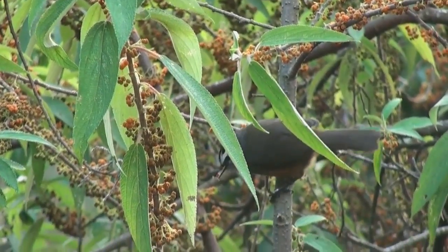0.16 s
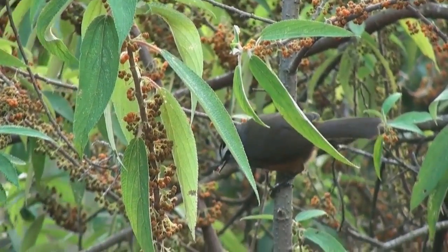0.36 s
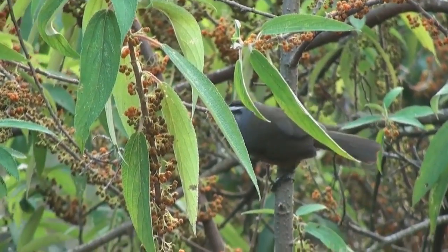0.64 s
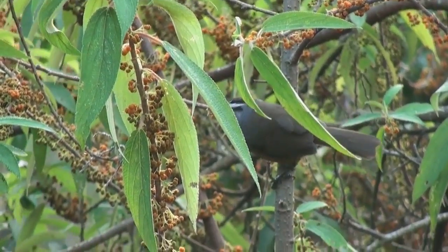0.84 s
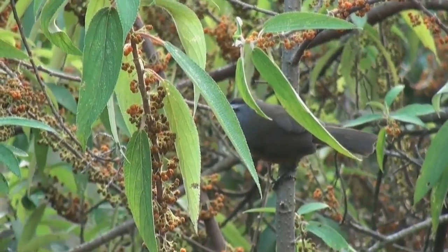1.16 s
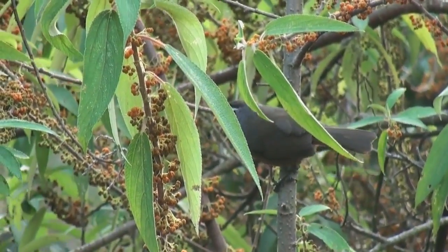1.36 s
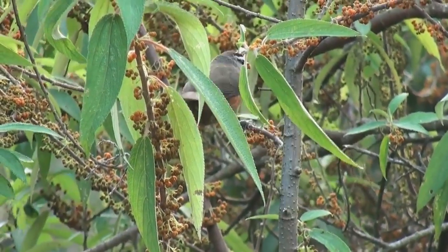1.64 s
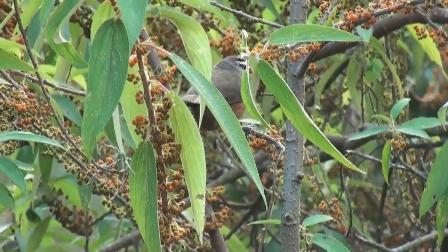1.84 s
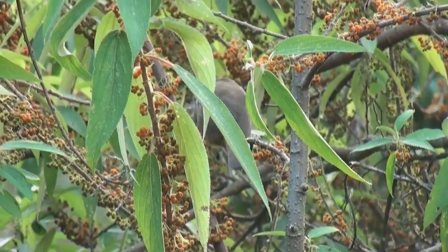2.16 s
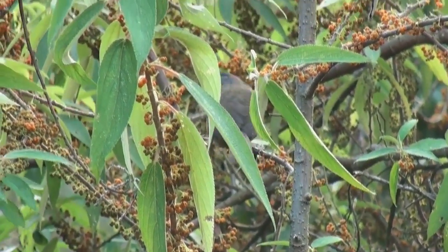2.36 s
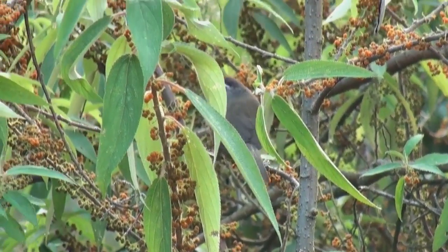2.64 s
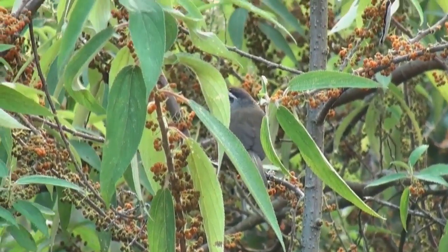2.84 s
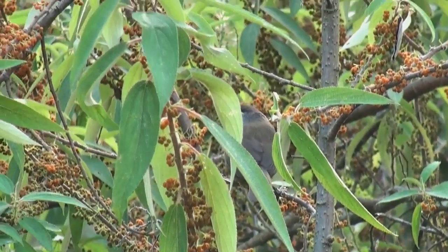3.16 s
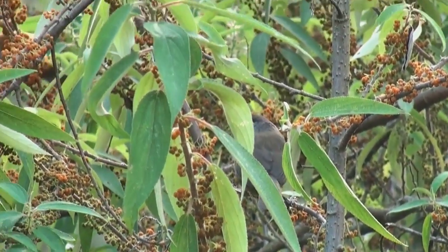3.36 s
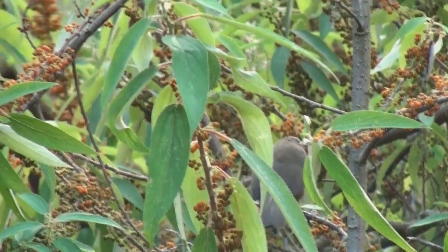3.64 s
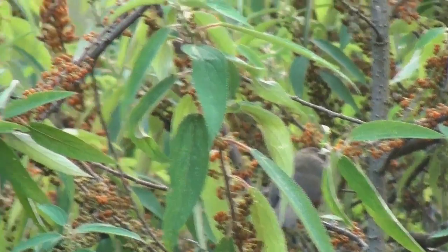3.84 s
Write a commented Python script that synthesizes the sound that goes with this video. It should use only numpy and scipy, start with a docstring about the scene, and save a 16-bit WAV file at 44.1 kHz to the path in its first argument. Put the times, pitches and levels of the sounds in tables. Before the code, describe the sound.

Thrush-like bird whistling brief gliding notes, echoing among leaves, over a steady airy background wash.

```python
"""Shrubs to the left and right of a camera, where thrushes whistle short, mostly falling notes; fainter birds
call from farther off. Each note is a near sine on a gliding pitch, and its echoes hang among leaves and trunks.
Short bursts of filtered noise make a soft low flutter as a bird hops and a brief rustle of leaves.
A broad outdoor wash of shaped noise and a thin high camera hiss lie under it all."""
import sys
import numpy as np
from scipy import signal
from scipy.fft import rfft, irfft
from scipy.io import wavfile
from scipy.ndimage import uniform_filter1d

SR = 44100
rng = np.random.default_rng(int(sys.argv[2]) if len(sys.argv) > 2 else 0)


def generate_wav(sig):
    """Save sig (samples, or channels by samples) to the path in sys.argv[1] as 16-bit PCM at SR."""
    pcm = np.round(np.clip(np.atleast_2d(sig).T, -1, 1) * 32767).astype(np.int16)
    wavfile.write(sys.argv[1], SR, pcm)


N = 176400  # 4 s

FLICKER_DB = 1.42  # slow level wander of the wash and of the hiss


def undb(db):
    """Decibels to an amplitude factor."""
    return 10 ** (np.asarray(db) / 20)


def unit(x):
    """Scale to an RMS of 1."""
    return x / np.sqrt(np.mean(x ** 2))


def walk(rate_hz, size):
    """Random levels held 1 / rate_hz seconds and slewed twice; spread near 1."""
    hold = int(SR / rate_hz)
    steps = np.repeat(rng.standard_normal(size // hold + 1), hold)
    slewed = uniform_filter1d(uniform_filter1d(steps, hold), hold)
    return 1.223 * slewed[:size]


def read(table, hz):
    """Read a (hz, db) curve along a logarithmic frequency axis."""
    table = np.array(table, float)
    return np.interp(np.log(hz + 1), np.log(table[:, 0]), table[:, 1])


def birds():
    """Every note stands at its own place between left and right; its echoes lean half as far to that side."""
    # Whistled notes, near and far: left_minus_right_db, echo_db (against the note), glide points
    # Each glide point: time_s, pitch_hz, level_db
    whistles = [ (-3, 4, [(-.09, 4450, -38), (-.05, 4190, -47), (-.01, 3644, -43.5), (0, 3420, -43.5)]),
                (5, -7.5, [(.025, 4670, -55), (.045, 4506, -38), (.07, 3780, -26.5), (.091, 3536, -28.5),
                (.098, 3030, -41)]), (3, -10, [(.135, 2476, -58), (.15, 2800, -43), (.181, 2815, -36.5),
                (.2, 2680, -35.5), (.225, 1860, -51)]), (2.5, -5, [(.195, 2750, -46), (.212, 2950, -36),
                (.235, 3000, -32), (.248, 2750, -39), (.266, 2200, -50)]), (2, -7.5, [(.355, 2687, -55),
                (.378, 2960, -38.5), (.402, 2970, -37.5), (.418, 2734, -40), (.43, 2360, -54)]),
                (2, -5, [(.535, 2670, -52), (.562, 2985, -37.5), (.585, 2947, -33), (.597, 2670, -46),
                (.61, 2400, -43)]), (1, -5.5, [(.725, 2710, -49), (.745, 2940, -39), (.765, 2995, -37.5),
                (.783, 2754, -41), (.805, 1980, -66)]), (10, 1, [(.93, 2950, -53), (.955, 2900, -53.5),
                (.975, 2590, -54), (.99, 2260, -53)]), (2, 1, [(.93, 3850, -52.5), (.944, 4350, -37.5),
                (.958, 4290, -35), (.983, 3920, -39), (1.02, 3420, -40.5), (1.035, 3120, -57)]),
                (-1, 4, [(1.026, 5600, -55), (1.042, 8100, -59)]), (-2, 3, [(1.045, 4850, -51),
                (1.066, 5970, -47), (1.08, 6150, -54)]), (-1, 7, [(1.082, 6310, -57), (1.1, 7250, -59),
                (1.112, 6500, -53), (1.122, 5750, -50), (1.14, 4400, -54)]), (8, -8, [(1.128, 4050, -45),
                (1.15, 4398, -35.5), (1.182, 3930, -31), (1.205, 3670, -30.5), (1.212, 3770, -61)]),
                (2, -8.5, [(1.19, 3477, -26), (1.2, 3330, -35), (1.228, 3047, -29.5), (1.243, 2860, -43.5),
                (1.265, 2270, -41)]), (6, -1.5, [(1.355, 3700, -49), (1.372, 3350, -35.5),
                (1.385, 3164, -46.5), (1.407, 3180, -50), (1.414, 3270, -35), (1.43, 3270, -66)]),
                (10, 3, [(1.345, 6450, -57), (1.38, 4970, -75)]), (2, -2, [(1.405, 4700, -59),
                (1.42, 4950, -54), (1.427, 4100, -53), (1.433, 3700, -55)]), (7, -4, [(1.545, 3900, -46.5),
                (1.565, 4480, -36.5), (1.6, 3940, -34), (1.622, 3780, -36), (1.632, 3256, -46),
                (1.642, 2400, -43)]), (-8, -16, [(1.75, 3050, -55), (1.77, 2500, -60), (1.8, 1910, -61)]),
                (11, -3.5, [(1.985, 3850, -71), (2.01, 3570, -55), (2.05, 3450, -66)]),
                (2, -3, [(2.13, 3700, -68), (2.16, 3250, -56)]), (2, 5, [(2.2, 1950, -62),
                (2.25, 1900, -63)]), (4, -5.5, [(2.13, 2766, -64), (2.152, 2860, -46), (2.174, 2680, -47),
                (2.192, 2314, -50.5), (2.212, 1600, -57)]), (0, -9, [(2.495, 3750, -69), (2.51, 3600, -57),
                (2.54, 3400, -68)]), (-2, -4, [(2.57, 3200, -69), (2.6, 3060, -62), (2.63, 2930, -68)]),
                (5, 0, [(2.73, 3410, -61), (2.77, 3400, -68)]), (-4.5, -6, [(2.778, 2763, -61),
                (2.79, 3090, -44.5), (2.83, 2957, -41), (2.85, 2625, -46.5), (2.87, 1950, -56)]),
                (-6, -1, [(3.0, 2715, -65), (3.04, 2890, -48), (3.064, 2760, -50), (3.08, 2514, -54.5),
                (3.092, 1920, -56)]), (-2, 6, [(3.325, 4090, -70), (3.36, 3930, -61.5), (3.42, 3800, -65),
                (3.44, 3650, -52.5)]), (-6, -3.5, [(3.37, 2886, -66), (3.388, 3326, -43.5),
                (3.415, 3335, -41), (3.455, 3136, -39.5), (3.475, 3255, -51), (3.49, 3490, -37)]),
                (4, -1.5, [(3.45, 2200, -61), (3.485, 2086, -52), (3.5, 2140, -61)]),
                (-2, 4, [(3.545, 2200, -59), (3.57, 2130, -56), (3.6, 2060, -58), (3.65, 2030, -62)]),
                (0, -4.5, [(3.595, 2690, -59), (3.62, 2800, -54), (3.64, 2640, -49.5), (3.66, 2350, -61)]),
                (-6, 4, [(3.705, 5000, -65), (3.714, 5580, -60), (3.74, 5230, -48), (3.765, 4390, -53.5),
                (3.785, 3430, -54.5)]), (-3, -10, [(3.71, 3820, -61), (3.73, 3800, -57), (3.76, 3860, -57),
                (3.768, 3840, -73)]), (-11, 2, [(3.96, 2600, -66), (3.985, 2680, -62.5),
                (4.01, 2750, -50)]), ]
    # Faint upward flicks after the repeated notes: start_s, level_db
    flicks = [(.268, -45.5), (0.431, -52), (0.612, -47), (.806, -49.5)]
    flick_s, flick_from_hz, flick_to_hz = 0.0162, 3000, 3500
    flick_pan_db, flick_echo_db = 1.5, -1.5

    notes = list(whistles)
    for s, db in flicks:
        curve = [(s, flick_from_hz, db), (s + flick_s, flick_to_hz, db)]
        notes.append((flick_pan_db, flick_echo_db, curve))

    lead = int(.1 * SR)  # room for a note that starts before time zero
    out = np.zeros((2, N + lead + 2 * SR))
    for pan_db, echo_db, curve in notes:
        start_s, note = whistle(curve, echo_db)
        sides = undb([[pan_db / 2], [-pan_db / 2]])
        mean_hz = np.mean(curve, axis=0)[1]
        reflected = signal.fftconvolve(echoes(mean_hz), note[None], axes=1)
        wet = undb(echo_db) * reflected * np.sqrt(sides)
        i = max(int(start_s * SR) + lead, 0)
        out[:, i:i + len(note)] += note * sides
        out[:, i:i + wet.shape[1]] += wet
    return out[:, lead:lead + N]


def whistle(curve, echo_db):
    """A wavering sine on a gliding pitch, with a faint octave and, near 4400 Hz, a line at 1.5 times the pitch."""
    edge_s, smooth_s = .004, 0.0085
    waver_hz, waver_base_db, pitch_waver = 190.5, 0.8, .003  # pitch_waver: share of the pitch per dB of waver
    far_from_db, far_waver = -6, .2  # notes with more echo waver more, dB per dB
    steep_hz_per_s, steep_waver_db = 36500, 4.5  # fast glides break up
    line_db, line_at_hz, line_width_hz = -23, 4400, 280
    octave_db, octave_lift_db = -36, 6.5

    s, hz, db = np.array(curve, float).T
    t = np.arange(s[0] - edge_s, s[-1] + edge_s, 1 / SR)

    def smooth(points):
        return uniform_filter1d(np.interp(t, s, points), int(smooth_s * SR))

    pitch = smooth(hz)
    steepness = np.minimum(np.abs(np.gradient(pitch)) * SR / steep_hz_per_s, 1)
    far_db = far_waver * max(echo_db - far_from_db, 0)
    waver_db = waver_base_db + far_db + steepness * steep_waver_db
    wavering_pitch = pitch * (1 + pitch_waver * waver_db * walk(waver_hz, len(t)))
    phase = 2 * np.pi * np.cumsum(wavering_pitch) / SR

    line = undb(line_db) * np.exp(-((pitch - line_at_hz) / line_width_hz) ** 2)
    # the octave is stronger where it falls near 1.5 * line_at_hz
    off_peak_hz = 2 * pitch - line_at_hz * 3 / 2
    lift_db = octave_lift_db * np.exp(-(off_peak_hz / (2 * line_width_hz)) ** 2)
    octave = undb(octave_db + lift_db)
    tone = np.sin(phase) + octave * np.sin(2 * phase) + line * np.sin(phase * 3 / 2)

    edge = np.clip(np.minimum(t - t[0], t[-1] - t) / (2 * edge_s), 0, 1)
    level = undb(smooth(db) + waver_db * walk(waver_hz, len(t)))
    return t[0], np.sqrt(2) * tone * edge * level


def echoes(hz):
    """Sparse quick echoes from nearby trunks, and an uneven cloud from the leaves that fades at two rates."""
    start_s, rise_s, patchy_db = 0.0044, 0.0053, 1.5
    early_t60_s, late_t60_s, late_db = 0.43, 1.27, 5.5  # fades for a note at pivot_hz; late against early
    pivot_hz, shorten = 3530, 1.1  # higher notes die away sooner
    likeness = 0.71  # share of the cloud's power common to left and right
    near_db, near_s, near_per_s = -5.5, 0.029, 1500  # trunks: level against the cloud, decay, density

    t = np.arange(int(1.2 * SR)) / SR
    faster = (hz / pivot_hz) ** shorten
    early = undb(-60 * t * faster / early_t60_s)
    late = undb(late_db - 60 * t * faster / late_t60_s)
    rise = np.clip((t - start_s) / rise_s, 0, 1)
    shape = (early + late) * rise * undb(patchy_db * walk(25.6, len(t)))

    common, left, right, strikes = rng.standard_normal((4, len(t)))
    noise = np.sqrt(likeness) * common + np.sqrt(1 - likeness) * np.array([left, right])
    cloud = noise * shape / np.sqrt(np.sum(shape ** 2))

    hit = rng.random(len(t)) < near_per_s / SR
    near = strikes * hit * np.exp(-t / near_s)
    return cloud + undb(near_db) * near / np.sqrt(near_per_s * near_s / 2)


def buzz():
    """Side tones around one whistle turn it buzzy, a little to the right; they swell and fade together."""
    # Side tones: offset_steps (of step_hz from center_hz), level_db
    side_tones = [(-2, -55), (-1, -55), (0.62, -51.5), (1.6, -55)]
    start_s, length_s, center_hz, step_hz = 3.445, 0.054, 3210, 340
    t = np.arange(N) / SR
    swell = np.sin(np.pi * np.clip((t - start_s) / length_s, 0, 1))
    tones = np.zeros(N)
    for offset, db in side_tones:
        tones += undb(db) * np.sin(2 * np.pi * (center_hz + offset * step_hz) * t)
    return np.sqrt(2) * swell * tones * undb([[-1.5], [1.5]])


def rustles():
    """Leaves and a hopping bird: short patchy bursts of band-passed noise, partly shared by both sides."""
    # Bursts: start_s, length_s, low_hz, high_hz, level_db
    bursts = [(.61, .08, 400, 14000, -57), (1.465, .08, 150, 850, -50), (1.8, .33, 180, 380, -61)]
    patchy_db = 3
    out = np.zeros((2, N))
    for s, length_s, low_hz, high_hz, db in bursts:
        n, i = int(length_s * SR), int(s * SR)
        sos = signal.butter(4, [low_hz, high_hz], "band", fs=SR, output="sos")
        mid, side = signal.sosfilt(sos, rng.standard_normal((2, SR)))[:, :n]
        shape = np.sqrt(np.hanning(n)) * undb(patchy_db * walk(139, n))
        stereo = np.array([mid + .5 * side, mid - .5 * side])
        out[:, i:i + n] += undb(db) * unit(stereo * shape)
    return out


def wash():
    """Broad outdoor noise, wide in the middle and narrower at both ends; low part and treble swell separately."""
    # Spectrum of the wash: frequency_hz, relative_density_db (per Hz)
    spectrum = [(20, -10), (75, -13), (105, -3), (160, -9), (205, -2), (500, -3), (1020, -2.5),
                (2500, -6.5), (5320, -13), (10000, -17), (15800, -26)]
    # Stereo width: frequency_hz, side_minus_mid_db
    width = [(40, -9), (130, -8), (400, -1), (8500, -.5), (12000, -3.5)]
    # Slow swell: time_s, low_gain_db, treble_gain_db
    swell = [(0, -55, -56), (.7, -54.5, -53.5), (1.2, -54.5, -53.5), (1.7, -53.5, -54), (2.5, -57.5, -58.5),
             (4, -57, -57)]
    split_hz = 2500

    hz, t = np.arange(N // 2 + 1) * SR / N, np.arange(N) / SR
    mid, side = rfft(rng.standard_normal((2, N))) * undb(read(spectrum, hz))
    side = side * undb(read(width, hz))
    stereo = np.array([mid + side, mid - side])
    # gains refer to the mid signal between 150 and 1500 Hz
    reference_band = (hz > 150) & (hz < 1500)
    scale = np.sqrt(np.mean(irfft(mid * reference_band, N) ** 2))

    s, low_db, treble_db = np.array(swell).T
    low = 1 / (1 + (hz / split_hz) ** 2)
    out = np.zeros((2, N))
    for share, db in ((low, low_db), (1 - low, treble_db)):
        gain = undb(np.interp(t, s, db) + FLICKER_DB * walk(6.05, N))
        out += gain * irfft(share * stereo, N) / scale
    return out


def hiss():
    """Gently flickering high hiss of the camera: band-passed noise, the same on both sides."""
    level_db, low_hz, high_hz = -66.5, 11360, 14400
    sos = signal.butter(2, [low_hz, high_hz], "band", fs=SR, output="sos")
    noise = unit(signal.sosfilt(sos, rng.standard_normal(N)))
    return undb(level_db + FLICKER_DB * walk(8, N)) * noise


def scene():
    """Birds in front, then the small movements, then the open air and the hiss."""
    return birds() + buzz() + rustles() + wash() + hiss()


def record(dry):
    """The camera cuts the top: a steep low-pass at 15750 Hz."""
    sos = signal.ellip(10, .2, 70, 15750, fs=SR, output="sos")
    return signal.sosfilt(sos, dry)


dry = scene()
out = record(dry)
generate_wav(out)
```